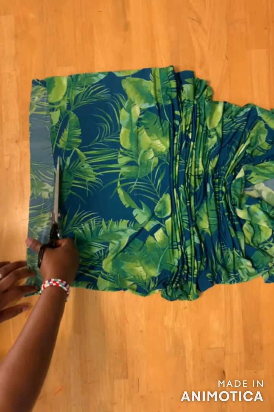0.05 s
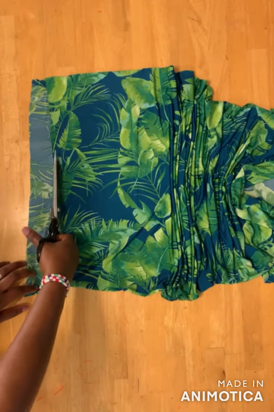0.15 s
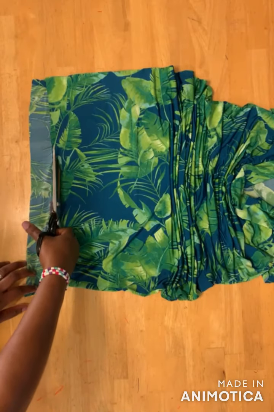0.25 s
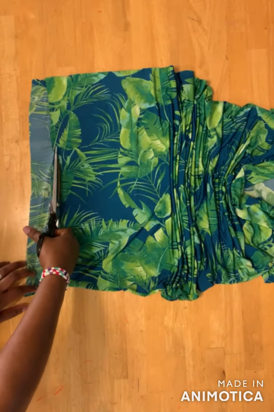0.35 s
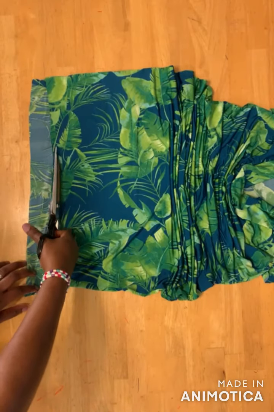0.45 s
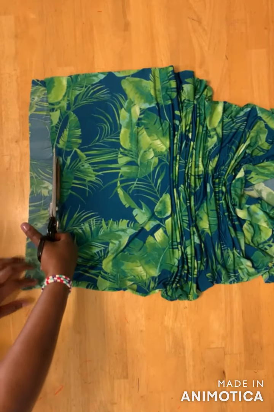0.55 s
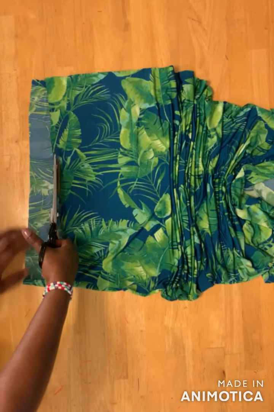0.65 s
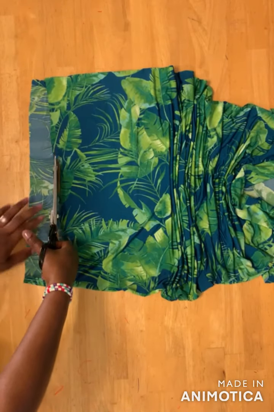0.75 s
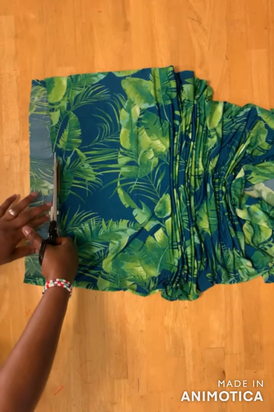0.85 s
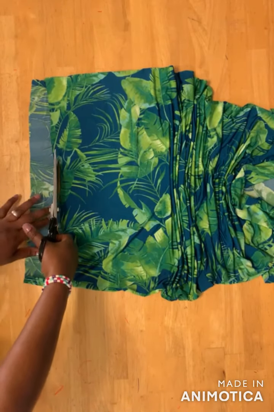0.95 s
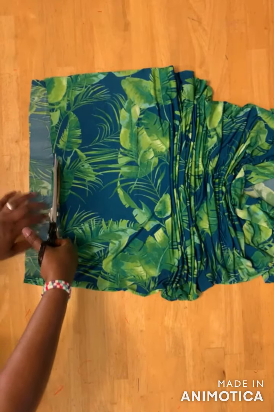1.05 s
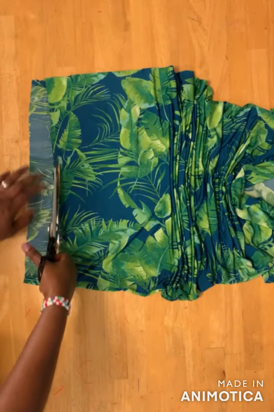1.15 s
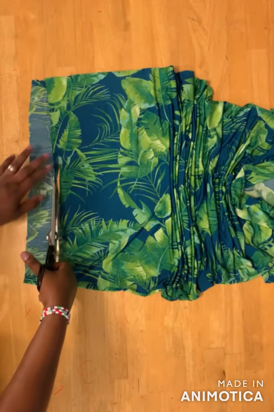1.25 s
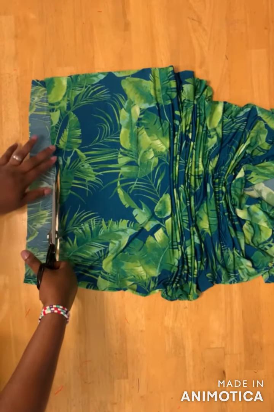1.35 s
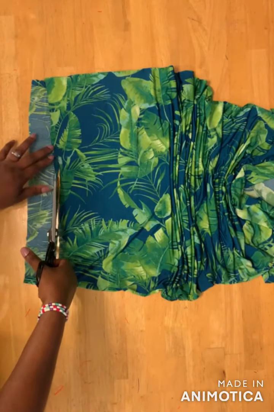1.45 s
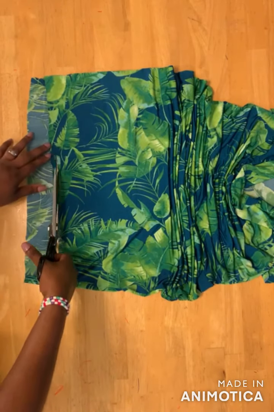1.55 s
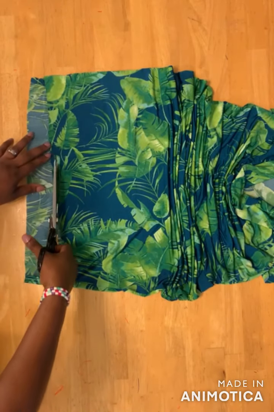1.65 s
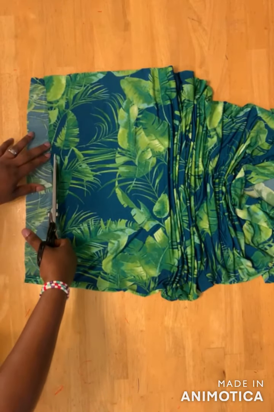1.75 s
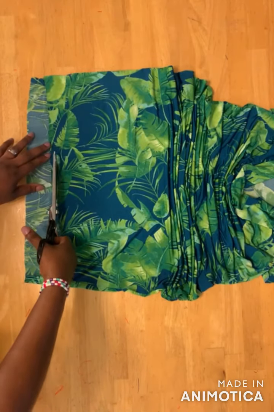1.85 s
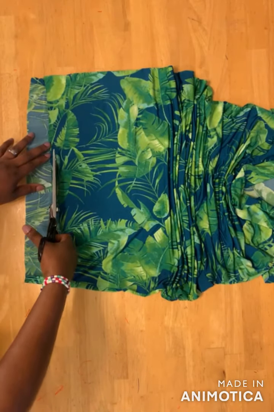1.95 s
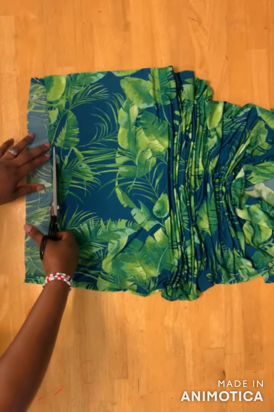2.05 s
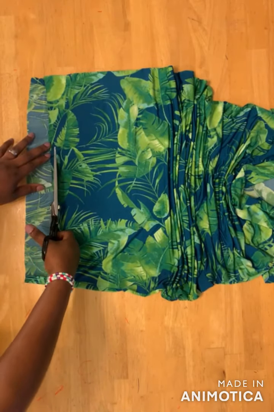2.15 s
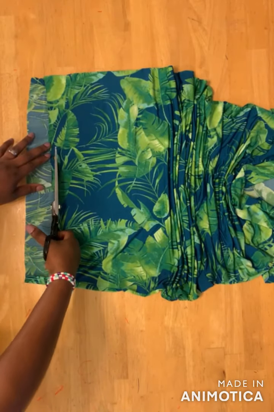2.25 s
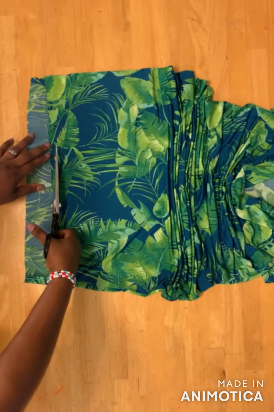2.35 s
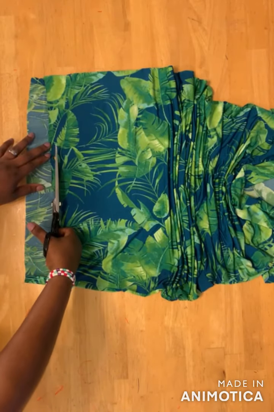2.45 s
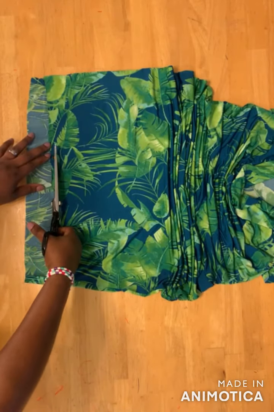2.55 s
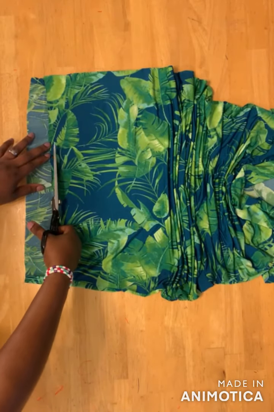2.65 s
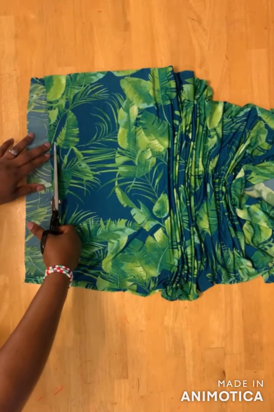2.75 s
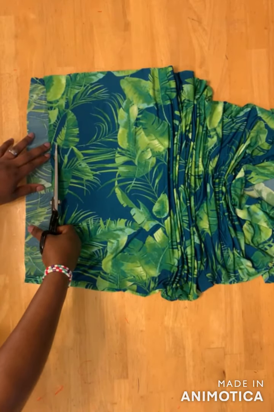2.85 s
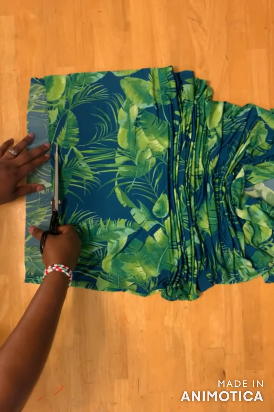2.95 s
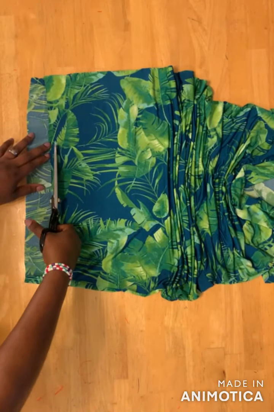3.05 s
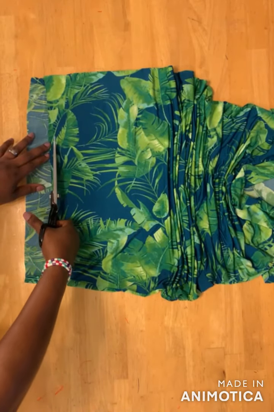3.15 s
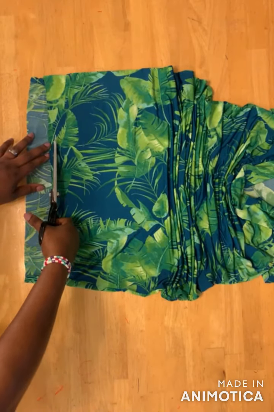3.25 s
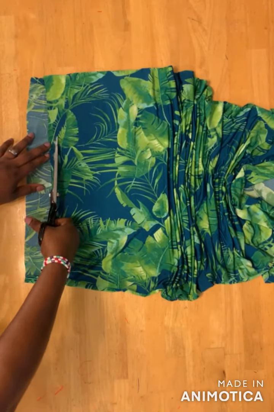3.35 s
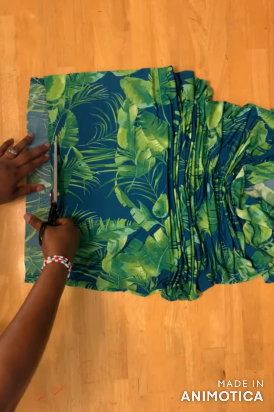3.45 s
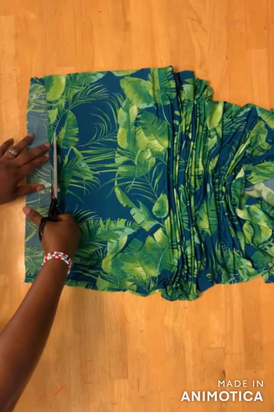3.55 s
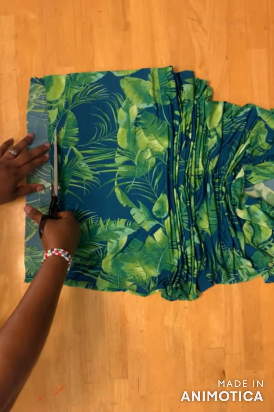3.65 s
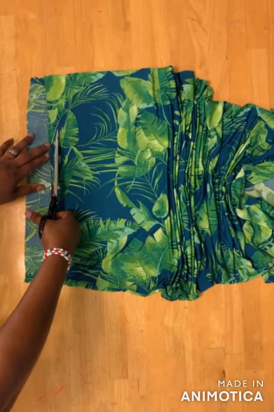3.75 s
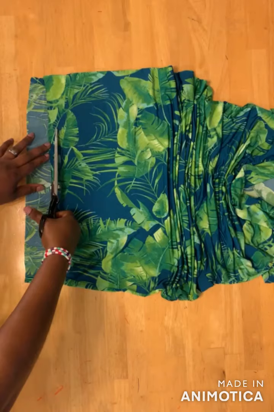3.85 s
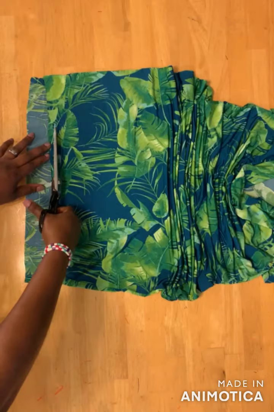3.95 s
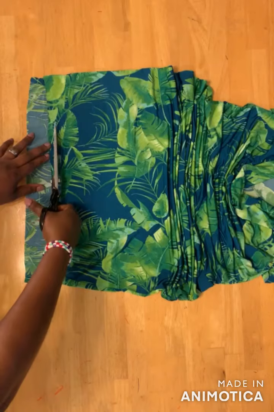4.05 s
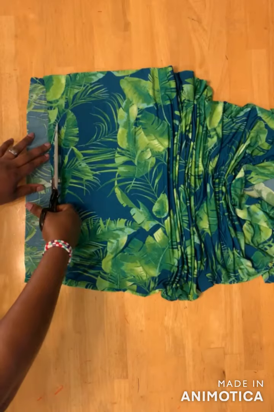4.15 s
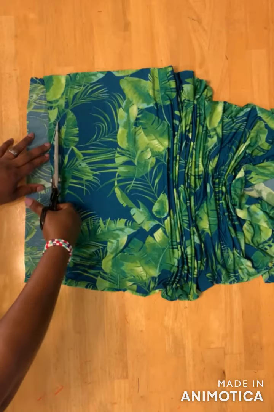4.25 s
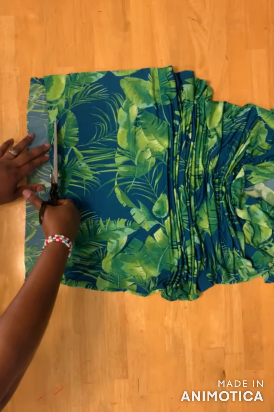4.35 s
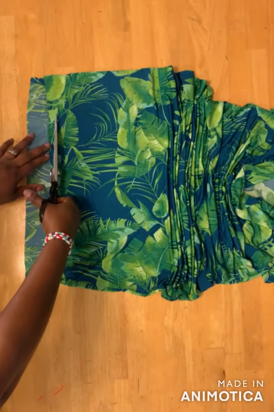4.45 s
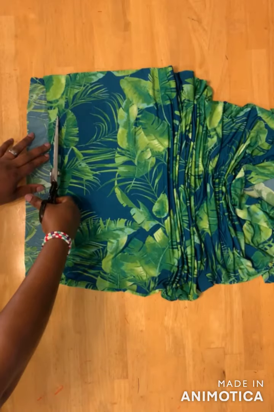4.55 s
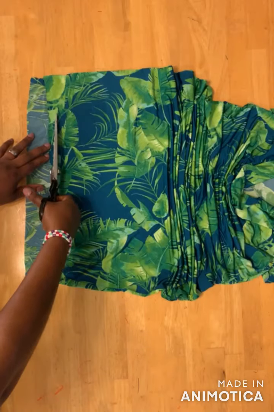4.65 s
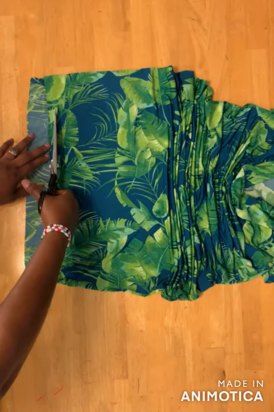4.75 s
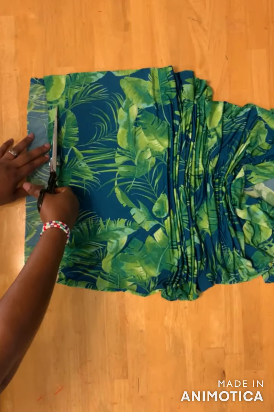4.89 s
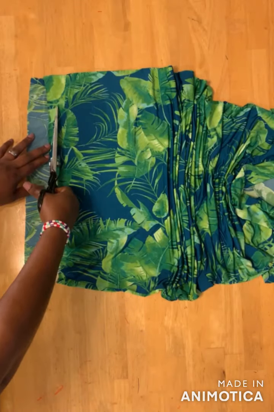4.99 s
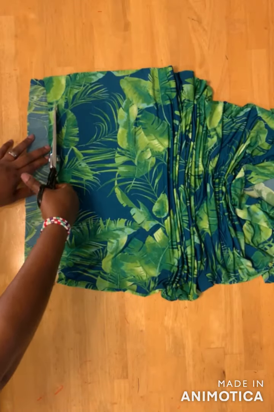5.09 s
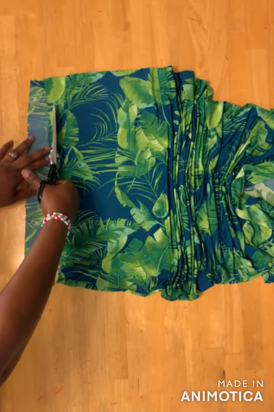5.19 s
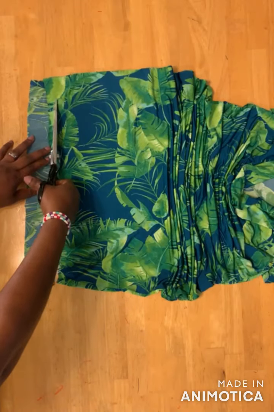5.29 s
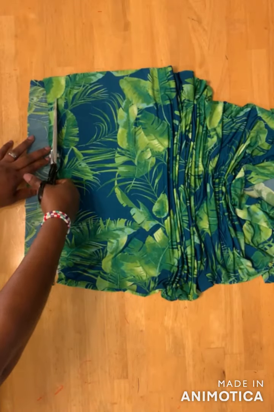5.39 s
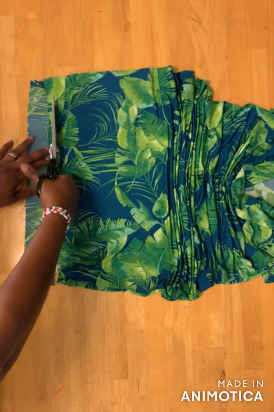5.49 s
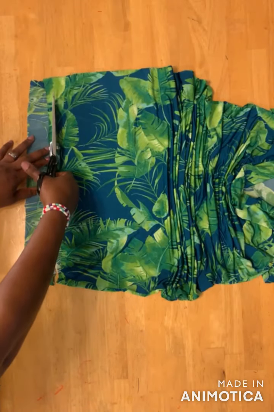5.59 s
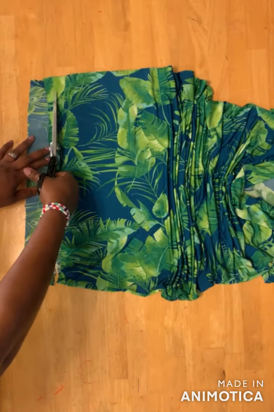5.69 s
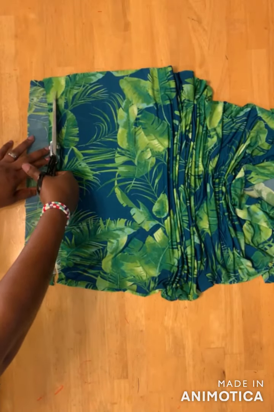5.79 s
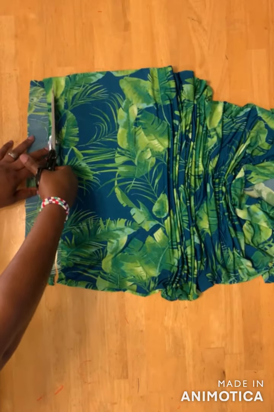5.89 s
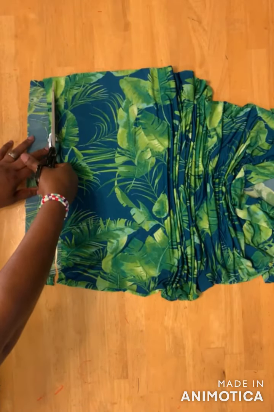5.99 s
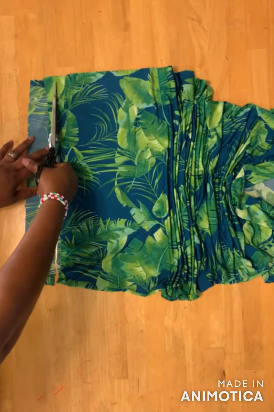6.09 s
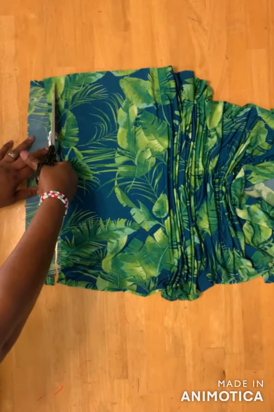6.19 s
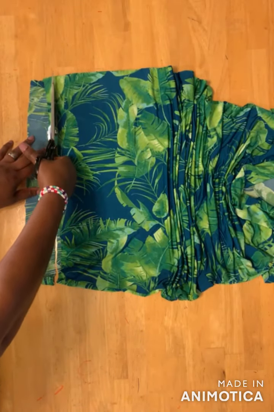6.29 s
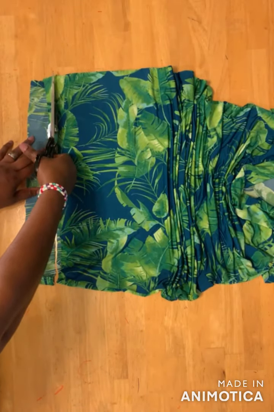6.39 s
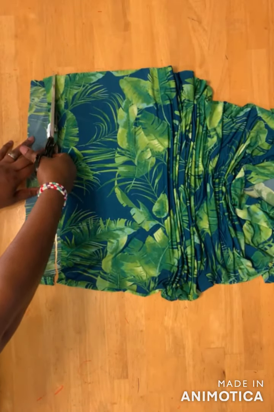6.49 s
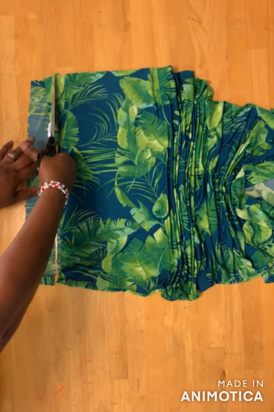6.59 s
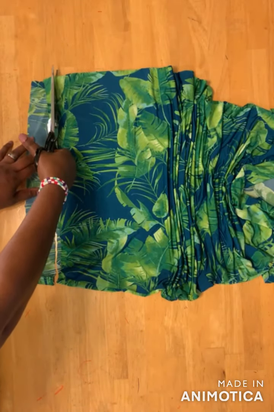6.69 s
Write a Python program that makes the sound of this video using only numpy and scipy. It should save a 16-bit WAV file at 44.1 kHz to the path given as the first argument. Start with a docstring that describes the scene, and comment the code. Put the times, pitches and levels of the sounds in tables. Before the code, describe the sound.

Soft fingertip pats on cloth, then eleven even, crunchy scissor cuts with scraping, clicking reopenings, and a loud final clack over faint room hum.

```python
"""Long steel scissors cut stretchy cloth spread on a wooden floor, below a phone with two microphone ports.
Each closing stroke crunches: uneven thread snaps and noise ring the boards, handles and blades.
Each opening stroke clicks and scrapes, and the last closing stroke snaps shut with a burst of hard blows.
A hand pats the cloth (short fading low tones) and strokes it (grainy noise); the pivot squeaks (rough tones).
Behind them lie patchy room noise, a fuzzy appliance hum and a mains tone; the cutting also echoes in the room."""
import sys
import numpy as np
from scipy import signal
from scipy.fft import rfft, irfft, next_fast_len
from scipy.io import wavfile
from scipy.ndimage import uniform_filter1d, map_coordinates

SR = 44100
rng = np.random.default_rng(int(sys.argv[2]) if len(sys.argv) > 2 else 0)


def wav_out(sig):
    """Save sig, one row per channel (or a flat mono array), as 16-bit PCM at SR to the path in sys.argv[1]."""
    wavfile.write(sys.argv[1], SR, np.round(np.clip(np.atleast_2d(sig).T, -1, 1) * 32767).astype(np.int16))


N = 296793  # length in samples

# All levels are relative: later gains still shift them.

# --- closing and opening strokes
# Closing strokes: start_s, time_to_full_bite_s, length_s, start_firmness_db, boards_db, crunch_db,
# scrape_db, hiss_db, and for the first contact: steel_db, knock_db
CUTS = [(2.301, 0.067, 0.15, 4.5, -45, -34, -48, -52, -46, -36),
        (2.775, 0.056, 0.1, -6, -43.5, -28, -45, -47.5, -81, -35),
        (3.198, 0.028, 0.091, 4, -45, -39.5, -52, -51, -72, -33),
        (3.604, 0.042, 0.087, -3.5, -38.5, -31, -42, -51.5, -72, -38),
        (3.979, 0.036, 0.1, -10, -44, -28.5, -40.5, -48.5, -62, -25),
        (4.36, 0.044, 0.12, -4.5, -36, -36, -47, -49, -47.5, -31),
        (4.75, 0.037, 0.083, -17.5, -41.5, -30.5, -43, -53, -56.5, -38.5),
        (5.125, 0.024, 0.124, -12.5, -38, -32.5, -42.5, -54, -61, -34),
        (5.509, 0.026, 0.099, -4, -40.5, -26, -41.5, -48, -68, -34),
        (5.902, 0.061, 0.065, -11, -41.5, -21, -45, -80, -65, -32),
        (6.301, 0.124, 0.17, -18, -31, -24, -57, -56, -59, -32)]
# First contact against full bite, for boards, crunch, scrape, hiss: level_db
BITE_DB = [7.5, -7, -9.5, -22]
# How fast boards, crunch, scrape, hiss weaken after full bite: loss_db_per_s
SAG_DB_PER_S = [114, 178, 151, 60.3]
CUT_ATTACK_S, CUT_RELEASE_S = 0.0033, 0.0072
LEAD_S, LEAD_DB = 0.022, -12  # the blade presses into the cloth before it bites
# Blades catching on a tougher bunch of threads: start_s, steel_db, knock_db, edge_db, twang_pitch_hz
CATCHES = [(0.04, -40.5, -45, -37.5, 1200), (2.31, -44.5, -29, -59, 555), (2.333, -34, -28, -46.5, 760),
           (2.362, -39, -49, -45, 650), (2.4045, -39, -24, -45.5, 787), (2.8037, -43, -40.5, -53, 503),
           (2.832, -45, -36, -44, 780), (2.8848, -47, -46, -55, 1380), (3.2199, -43, -31.5, -53, 507),
           (3.245, -34, -25, -43, 762), (3.606, -61, -30, -67, 890), (3.6303, -45.5, -52, -65, 660),
           (3.6679, -58, -29, -65, 795), (3.7262, -55, -48, -56, 970), (3.983, -45, -39, -61, 1640),
           (4.013, -35, -26.5, -66, 1040), (4.3876, -31.5, -29, -60, 1443), (4.398, -54, -24, -68, 1376),
           (4.4219, -36.5, -31.5, -56, 1385), (4.7945, -36, -25, -50.5, 1446), (5.1574, -60, -27, -70, 490),
           (5.169, -53, -54, -72, 1470), (5.179, -41, -36.5, -55, 1270), (5.198, -47, -32, -56, 1080),
           (5.2372, -66, -64, -62, 1120), (5.512, -64, -35, -63, 1115), (5.5346, -54, -25.5, -55, 486),
           (5.5658, -31.5, -36, -56, 1090), (5.907, -47, -47.5, -68, 580), (5.9307, -37, -25.5, -71, 1186),
           (5.9631, -33, -30, -77, 746), (5.975, -62, -28.5, -77, 1487), (6.167, -40, -49.5, -42.5, 1300),
           (6.3284, -45, -36, -53, 720), (6.344, -35, -34, -41, 520), (6.36, -32, -36, -33.5, 525),
           (6.383, -33.5, -22, -45, 548), (6.396, -34, -30, -43, 1290), (6.4193, -24.5, -17.5, -42, 620),
           (6.4751, -45, -52, -33.5, 1400)]
# Opening strokes: start_s, steel_click_db, knock_db, cloth_rub_db, twang_pitch_hz
OPENS = [(.004, -40.5, -44, -68, 1120), (2.552, -40.5, -38, -34.5, 1060), (2.978, -39.5, -32.5, -42.5, 823),
         (3.381, -43, -43, -36, 494), (3.793, -43, -35.5, -47.5, 427), (4.168, -40, -39.5, -38, 1020),
         (4.548, -42.5, -38, -37, 730), (4.94, -42, -48, -42, 1390), (5.313, -46, -36, -35.5, 424),
         (5.707, -42, -45, -42, 1160), (6.119, -40, -66, -37.5, 1222)]
# Share of the opening rub in boards, crunch, scrape, hiss: level_db
RUB_MIX_DB = [-27, 2.5, -11, -21]
RUB_ATTACK_S, RUB_T60_S = 0.004, 0.17  # T60: time to fall by 60 dB
# Blades sliding along each other near the ends of their travel: middle_s, length_s, scrape_db, hiss_db
SLIDES = [(-0.001, 0.14, -45, -45), (0.048, .026, -64, -45), (3.834, 0.034, -67, -64),
          (5.002, 0.067, -46.5, -51.5), (5.401, 0.075, -47.5, -53.5), (5.788, 0.12, -52, -61),
          (6.169, 0.074, -47.5, -41.5), (6.481, 0.043, -22, -45)]
SLIDE_CRUNCH_DB = 1  # the handles rumble along, against the scrape
EDGE_CLICK_DB = -5.5  # edge against steel at first contacts and opening clicks

# --- what rings
# Floor boards: pitch_hz, width_hz, level_db
BOARD_MODES = [(58.4, 16.3, -2), (115.7, 56.5, 0.5), (164, 61, 2), (249.5, 20, 3.5), (313, 53, -1),
               (365.6, 143, -4.5)]
# Handle and cloth on wood: pitch_hz, width_hz, first_cut_level_db, last_cut_level_db
BODY_MODES = [(525, 165.5, 8, 17.5), (673, 172, 10, 16.5), (769, 83.6, 12.5, 15), (1104, 47, 11, 16),
              (1254, 24.4, 10, 18.5), (1376, 37.5, 8, 17), (1508, 71, 1, 15.5), (1681, 53, -1, 6),
              (1746, 36, -7.5, 9.5), (1873, 135, -19.5, -1)]
# Steel blades, body and thin edge: pitch_hz, width_hz, level_db
STEEL_MODES = [(2376, 180, 3.5), (3030, 83, 8), (3274, 51, 9.5), (3800, 600, 1), (3875, 63, 1.5),
               (4160, 270, -22.5), (5450, 350, 7.5), (5675, 98, 14), (5807, 360, 6.5), (6340, 24.3, 5.5),
               (6460, 230, 0), (7394, 87, 1)]
# Highest ringing, for the edge hiss: pitch_hz, width_hz, level_db
EDGE_MODES = [(7900, 74, -8.5), (8650, 670, 1.5), (9470, 410, -17.5), (10600, 82, -18.5), (9880, 270, 2.5),
              (10230, 74, 5), (10640, 275, 1), (11680, 220, -3.5)]
# Long blade's bending tone while it hangs free of the cloth: time_s, level_against_crunch_db
SINGING = [(0, -16), (2.35, -16), (2.85, -29), (3.25, -11.5), (3.66, -14.5), (4.05, -11), (4.4, -10),
           (4.6, -11), (4.82, -20), (5.0, -13.5), (5.2, -6), (5.38, -19), (5.58, -9.5), (5.78, -10.5),
           (5.9, -37), (6.2, -22), (6.3, -39)]
BEND_HZ, BEND_T60_S = 943, 0.21
TWANG_T60_S, TWANG_ATTACK_S = 0.033, 0.002

# --- final snap and pivot
# Handle stops graze, meet, then rebound more softly: start_s, level_db, treble_db
SHUT = [(6.466, -23, -10), (6.4806, -11, -4), (6.4818, 1, 1), (6.4843, -7, -3), (6.4885, -5, -6),
        (6.493, -6, -6), (6.498, -11, -5)]
# Handle stops ringing on the boards: pitch_hz, width_hz, level_db
STOP_MODES = [(53.3, 4.6, -2.5), (73.7, 8, -17), (140, 24, -2), (186.7, 21, 0.5), (247, 98, 1.5),
              (390, 80, 4), (680, 28, 0), (1075, 25, 8), (1370, 165, 4.5), (1480, 142, 1.5),
              (1700, 130, 7.5), (1910, 324, 0.5), (2270, 69, -21.5), (2460, 69, -11.5), (2860, 31, -12.5),
              (3290, 410, -7.5), (3690, 430, -8), (5260, 940, -17.5), (6250, 175, -16.5),
              (6930, 740, -23.5), (9640, 330, -17.5)]
SOFT_HZ = 2510  # the treble level acts above here
SNAP_WET_DB = -5  # the snap gets less room echo than the strokes
# Pivot squeaking under load: start_s, length_s, pitch_hz, level_db
SQUEAKS = [(.015, .03, 2380, -64), (4.385, .06, 2480, -60), (4.985, .045, 2420, -63),
           (5.38, .06, 2470, -57), (5.555, .06, 2490, -58), (5.765, .065, 2480, -65),
           (5.925, .08, 3400, -60), (6.405, .04, 3320, -46)]

# --- hand on the cloth
# Pats and fingertip taps: start_s, level_db, pitch_hz
PATS = [(0.671, -37.5, 163), (0.68, -51, 1090), (0.721, -33.5, 302), (0.749, -48, 320), (0.9, -30, 215),
        (0.931, -30.5, 240), (1.151, -39, 264), (1.517, -45.5, 1093), (1.67, -47, 262), (1.701, -37, 288),
        (1.737, -37, 114), (1.753, -53, 220)]
# Fingers or open blades sliding on the cloth: start_s, length_s, level_db
RUSTLES = [(0.573, 0.068, -65.5), (0.633, 0.099, -64.5), (1.318, 0.023, -71.5), (1.507, 0.039, -66),
           (1.57, 0.053, -62.5), (2.207, 0.096, -60), (3.168, 0.061, -63), (3.569, 0.051, -56)]
# Tone colour of the rustle: pitch_hz, level_db
CLOTH_COLOUR = [(300, 6), (1100, 9.5), (2200, -3.5), (3500, -16), (5000, -10), (11000, -19.5)]

# --- room and microphone ports (likeness: 0 is unrelated, 1 is alike, left against right)
# Time for the room echo to fall by 60 dB: pitch_hz, fall_time_s
ROOM_T60 = [(100, 0.65), (500, 0.25), (1500, 0.37), (4000, 0.28), (11000, 0.2)]
# Room echo against direct sound: pitch_hz, level_db
ROOM_COLOUR = [(100, -10), (500, -1.5), (1500, -4), (4000, -8), (11000, -12.5)]
# Likeness of the room echo: pitch_hz, likeness_0_to_1
ROOM_ALIKE = [(100, 1), (400, 1), (900, 0), (3200, 0.38), (6000, 1), (11000, 0.78)]
# Likeness of the direct sound, loosened by scatter off hand and cloth: pitch_hz, likeness_0_to_1
NEAR_ALIKE = [(300, 1), (1000, 0.8), (2500, 0.5), (4500, 0.84), (8500, 0.98), (12000, 0.82)]
SCATTER_T60_S = 0.005
# How far the left port's wave is ahead: pitch_hz, phase_radians
PORT_PHASE = [(60, 0), (500, -.3), (1100, -.4), (1600, .4), (2200, .7), (3500, 1.9), (4300, 2.9),
              (5200, 3.4), (6300, 6.1), (7400, 6.6), (8400, 9.1), (9400, 9.7), (10500, 12.1), (11400, 12.8),
              (12200, 14)]
# How much louder the left port is: pitch_hz, left_minus_right_db
PORT_LEVEL = [(200, 0), (700, -0.5), (1400, -0.5), (3000, -0.5), (8000, 0.5), (12000, 0)]
TOP_HZ = 12500  # the phone's upper band limit

# --- background
# Tone colour of the room noise: pitch_hz, level_db
AIR_COLOUR = [(20, -12.5), (40, -5.5), (60, 6.5), (90, -19), (125, -2), (190, -4.5), (250, -16.5),
              (400, -3.5), (800, -15), (1150, -18), (1500, -19), (2400, -35.5), (5000, -39.5),
              (11500, -43.5)]
# Appliance hum: pitch_hz, width_hz, level_db
HUM_MODES = [(59.1, 7.4, -3.5), (121.6, 9.5, -1.5), (242.6, 11.2, 2), (309.3, 31.6, -4), (1077, 13, -11.5),
             (1210, 33, -16)]
# Likeness of the background: pitch_hz, likeness_0_to_1
AIR_ALIKE = [(25, 0.7), (60, 1), (150, 1), (400, 0.94), (900, 0), (3200, 0), (4400, 1), (11000, 1),
             (12000, 0.1)]
MAINS_HZ = 58.4


def cutting():
    """Thread snaps and jolts shake boards, handle and steel; the handle's ring changes from first cut to last."""
    boards, crunch, scrape, hiss = stroke_gains()
    steel, knock, edge = jolts()
    board_grain = threads(rate=500, spread_db=-1.5, clump_db=2.0, smooth=0.25)
    crunch_grain = threads(rate=350, spread_db=2, clump_db=3.5, smooth=0.2)
    fine_grain = threads(rate=800, spread_db=2.5, clump_db=4, smooth=0.5)

    # the forces that set each part ringing
    board_force = boards * board_grain + amp(2) * knock
    body_force = patchy(crunch * crunch_grain + amp(10) * knock, depth_db=3, bins=2, frames=12)
    steel_force = patchy(scrape * fine_grain + amp(7) * steel, depth_db=5.5, bins=2, frames=16)
    edge_force = patchy(hiss * fine_grain + amp(14) * edge, depth_db=5.5, bins=2, frames=16)

    # crossfade the handle's ring from the first cut to the last
    travel = np.interp(seconds(), [CUTS[0][0], CUTS[-1][0]], [0, np.pi / 2])
    first_ring = ringing(body_force, [(hz, width, first) for hz, width, first, _ in BODY_MODES])
    last_ring = ringing(body_force, [(hz, width, last) for hz, width, _, last in BODY_MODES])
    body = np.cos(travel) * first_ring + np.sin(travel) * last_ring

    wood = amp(-2.5) * ringing(board_force, BOARD_MODES) + amp(-9.5) * body
    blades = amp(-7) * ringing(steel_force, STEEL_MODES) + amp(-3) * ringing(edge_force, EDGE_MODES)
    return wood + blades + singing(crunch) + twangs()


def stroke_gains():
    """Loudness of boards, crunch, scrape and hiss: cuts bite and sag, rubs die away, slides swell and fade."""
    gains, t = np.zeros((4, N)), seconds()
    bite, sag, rub_mix = (np.array(v)[:, None] for v in (BITE_DB, SAG_DB_PER_S, RUB_MIX_DB))
    for start, rise, span, firmness_db, *levels_db, _, _ in CUTS:
        level = np.array(levels_db)[:, None]
        here = slice(round(start * SR), round(start * SR) + SR // 3)
        u = t[here] - start
        shape_db = (bite + firmness_db) * np.clip(1 - u / rise, 0, 1) - sag * np.clip(u - rise, 0, 1)
        fade_in = np.clip(u / CUT_ATTACK_S, 0, 1)
        fade_out = np.clip(1 - (u - span) / CUT_RELEASE_S, 0, 1)
        gains[:, here] += fade_in * fade_out * amp(level + shape_db)
        # the soft press just before the bite
        press = np.clip(1 + (t - start) / LEAD_S, 0, 1) * np.clip(1 - (t - start) / CUT_ATTACK_S, 0, 1)
        gains += press * amp(level + bite + firmness_db + LEAD_DB)
    for start, _, _, rub_db, _ in OPENS:
        here = slice(round(start * SR), round(start * SR) + SR // 3)
        u = t[here] - start
        onset = 1 - np.exp(-abs(u) / RUB_ATTACK_S)
        gains[:, here] += amp(rub_db + rub_mix - 60 * u / RUB_T60_S) * onset
    for middle, span, scrape_db, hiss_db in SLIDES:
        swell = np.cos(np.pi * np.clip((t - middle) / span, -.5, .5)) ** 2
        gains[1:] += swell * amp([[scrape_db + SLIDE_CRUNCH_DB], [scrape_db], [hiss_db]])
    return gains


def threads(rate, spread_db, clump_db, smooth):
    """Parting threads: clumps of uneven clicks (rate a second) mixed with a share of smooth friction noise."""
    when, size = rng.random((2, N))
    sizes = amp(-spread_db * np.log(size + 1e-3))
    snaps = (when < rate / SR) * sizes * rng.choice([-1, 1], N)
    mix = np.sqrt(1 - smooth) * unit(snaps) + np.sqrt(smooth) * rng.standard_normal(N)
    return evened(mix * amp(clump_db * wobble(70)), span=.035)


def jolts():
    """First contacts, catches and opening clicks: short noise bursts of force on steel, handle and edge."""
    out, t = np.zeros((3, N + SR)), np.arange(SR // 20) / SR
    clicks = [(cut[0], *cut[-2:]) for cut in CUTS] + [opening[:3] for opening in OPENS]
    hits = [(*click, click[1] + EDGE_CLICK_DB) for click in clicks] + [c[:4] for c in CATCHES]
    fall_s = np.array([[0.04], [0.04], [0.035]])  # time to fall by 60 dB: steel, knock, edge
    shape = amp(-60 * t / fall_s) * (1 - np.exp(-t / 0.003))
    for start, *levels_db in hits:
        burst = shape * rng.standard_normal((3, len(t)))
        out[:, round(start * SR):][:, :len(t)] += amp(levels_db)[:, None] * burst
    return out[:, :N]


def singing(crunch):
    """The bending tone builds up under the crunch and dies slowly, wavering in loudness and pitch."""
    t, keep = seconds(), amp(-60 / (BEND_T60_S * SR))
    push = crunch * amp(np.interp(t, *np.transpose(SINGING)))
    swell = signal.lfilter([1 - keep], [1, -keep], push)
    waver = amp(4 + 3 * wobble(20) + 3 * wobble(70))
    return waver * swell * np.sin(2 * np.pi * (BEND_HZ * t + .14 * wobble(40)))


def twangs():
    """Catches and opening clicks pluck the handle mode under the contact point: a short fading tone."""
    out, t = np.zeros(N + SR), np.arange(SR // 8) / SR
    shape = amp(-60 * t / TWANG_T60_S) * (1 - np.exp(-t / TWANG_ATTACK_S))
    for start, _, knock_db, _, hz in CATCHES + OPENS:
        out[round(start * SR):][:len(t)] += amp(knock_db) * shape * np.sin(2 * np.pi * hz * t)
    return out[:N]


def snap():
    """Hard blows into the handle stops: each is a sharp contact, then a few milliseconds of chatter."""
    force, t = np.zeros(N), np.arange(SR // 50) / SR
    bursts = 5 * (t == 0) + .22 * rng.standard_normal((len(SHUT), len(t)))
    dull = signal.lfilter(*signal.butter(2, SOFT_HZ, fs=SR), bursts)
    for (start, db, treble_db), full, low in zip(SHUT, bursts, dull):
        blow = low + amp(treble_db) * (full - low)
        force[round(start * SR):][:len(t)] += amp(db - 60 * t / 0.016) * blow
    return ringing(force, STOP_MODES)


def squeaks():
    """The pivot sticks and slips: a short tone, rough in pitch and loudness."""
    t = seconds()
    waver = 18 * np.cumsum(wobble(150)) / SR  # in turns of the wave: the pitch wanders by some 18 Hz
    flutter = amp(5 * wobble(250) - 2)
    tones = sum(amp(db) * arch(start, span) * np.sin(2 * np.pi * (hz * t + waver))
                for start, span, hz, db in SQUEAKS)
    return flutter * tones


def pats():
    """Soft finger contacts: each a quickly fading tone, mostly a low thump."""
    out, t = np.zeros(N + SR), np.arange(SR // 4) / SR
    for start, db, hz in PATS:
        shape = amp(db - 60 * t / 0.055) * (1 - np.exp(-t / 0.0015))
        out[round(start * SR):][:len(t)] += shape * np.sin(2 * np.pi * hz * t)
    return out[:N]


def rustles():
    """Faint grainy friction on the cloth: dense thread clicks and noise, tinted by the cloth."""
    gain = sum(amp(db) * arch(start, span) for start, span, db in RUSTLES)
    grain = threads(rate=1200, spread_db=1.5, clump_db=3, smooth=0.55)
    return gain * unit(filtered(grain, lambda hz: amp(along(CLOTH_COLOUR, hz))))


def scatter(x):
    """A few milliseconds of scatter off the nearby hand and cloth, drawn anew every tenth of a second."""
    out, hop, t = np.zeros(N + SR), SR // 10, np.arange(SR // 50) / SR
    for start in range(0, N, hop):
        echo = amp(-60 * t / SCATTER_T60_S) * rng.standard_normal(len(t))
        piece = signal.fftconvolve(x[start:start + hop], echo / np.linalg.norm(echo))
        out[start:start + len(piece)] += piece
    return out[:N]


def room(x):
    """Two noise-like echo tails, drawn anew every third of a second; each pitch dies at its own speed."""
    out, hop, delay = np.zeros((2, N + 2 * SR)), SR // 3, 300  # delay in samples
    for start in range(0, N, hop):
        hz, t, z = signal.stft(rng.standard_normal((2, SR // 2)), SR, nperseg=256)
        fading = z * amp(-60 * t / along(ROOM_T60, hz)[:, None])
        tail = signal.istft(fading, SR, nperseg=256)[1]
        wet = signal.fftconvolve(x[None, start:start + hop], tail / np.linalg.norm(tail[0]), axes=1)
        begin = start + delay
        out[:, begin:begin + wet.shape[1]] += wet
    return out[:, :N]


def ports(pair, alike):
    """Blend two unrelated sounds to the given left-right likeness, then step phase and level between ports."""
    half = np.array([[.5], [-.5]])

    def blend(hz):
        turn = np.arccos(np.clip(along(alike, hz), 0, 1)) / 2
        return np.array([np.cos(turn), np.sin(turn)])

    def step(hz):
        return amp(half * along(PORT_LEVEL, hz)) * np.exp(1j * half * along(PORT_PHASE, hz))

    mid, side = filtered(pair, blend)
    return filtered(np.array([mid + side, mid - side]), step)


def air():
    """Room noise in slow patches, a fuzzy hum of noise through narrow resonances, and a wavering mains tone."""
    pair = patchy(rng.standard_normal((2, N)), depth_db=3.5, bins=3, frames=20)
    noise = unit(filtered(pair, lambda hz: amp(along(AIR_COLOUR, hz))))
    hum = unit(ringing(rng.standard_normal((2, N)), HUM_MODES)) * amp(1.5 * wobble(9))
    hum = filtered(hum, lambda hz: 1 / (1 + (hz / 1600) ** 4))
    mains_turns = MAINS_HZ * seconds() + 0.038 * wobble(3.1)
    mains = amp(-57.5 + 1.4 * wobble(12)) * np.sin(2 * np.pi * mains_turns)
    return amp(-60.5) * noise + amp(-53.5) * hum + mains * [[1], [0]]  # mains goes into the shared part only


def amp(db):
    """Turn a level in dB into a plain multiplier."""
    return 10 ** (np.asarray(db) / 20)


def seconds():
    """The time of every sample, in seconds."""
    return np.arange(N) / SR


def arch(start, span):
    """A smooth half-sine rise and fall, from start over span seconds."""
    return np.sin(np.pi * np.clip((seconds() - start) / span, 0, 1))


def unit(x):
    """x scaled to an average strength (rms) of 1."""
    return x / np.sqrt(np.mean(x ** 2) + 1e-20)


def evened(x, span):
    """x with its running strength (rms) over span seconds held at about 1."""
    return x / np.sqrt(abs(uniform_filter1d(x ** 2, size=int(span * SR))) + 1e-9)


def along(points, hz):
    """Read a curve of (pitch_hz, value) points, joined by straight lines on a log pitch axis."""
    f, v = np.transpose(points)
    return np.interp(np.log(hz + 1), np.log(f + 1), v)


def wobble(rate):
    """A smooth random curve with rate new random points a second."""
    return map_coordinates(rng.standard_normal(int(N * rate / SR) + 4), [np.arange(N) * rate / SR])


def filtered(x, response):
    """x with each frequency multiplied by response(hz), which may also turn its phase."""
    m = next_fast_len(N + SR // 2)
    return irfft(rfft(x, m) * response(np.fft.rfftfreq(m, 1 / SR)), m)[..., :N]


def ringing(x, modes):
    """x through a set of resonances with alternating signs, scaled together to unit energy."""
    def response(f):
        total = 0
        for k, (hz, width, db) in enumerate(modes):
            total = total + (-1) ** k * amp(db) * 1j * f * width / (hz * hz - f * f + 1j * f * width)
        return total / np.sqrt(np.mean(abs(total) ** 2))
    return filtered(x, response)


def patchy(x, depth_db, bins, frames):
    """x recoloured in random patches of pitch and time; the gains at each moment average to unit power."""
    z = signal.stft(x, nperseg=256)[2]
    field = uniform_filter1d(rng.standard_normal(z.shape[-2:]), size=bins, axis=0)
    field = uniform_filter1d(field, size=frames, axis=1)
    gain = amp(depth_db * unit(field))
    gain = gain / np.sqrt(np.mean(gain ** 2, axis=0))
    return signal.istft(z * gain, nperseg=256)[1][..., :N]


def scene():
    """Scissors and hand reach the ports directly and through the room (no room for squeaks), over background."""
    near, shut = cutting() + pats() + rustles(), snap()
    direct = amp(-1.0) * (near + shut + squeaks())
    echo = room(near + amp(SNAP_WET_DB) * shut)
    echo = filtered(echo, lambda hz: amp(along(ROOM_COLOUR, hz)))
    close_sound = ports(np.array([direct, scatter(direct)]), NEAR_ALIKE)
    return close_sound + ports(echo, ROOM_ALIKE) + ports(air(), AIR_ALIKE)


def record(dry):
    """The phone rolls off its top treble and keeps nothing above its band limit."""
    return filtered(dry, lambda hz: (hz < TOP_HZ) / (1 + (hz / 11900) ** 40))


dry = scene()
out = record(dry)
wav_out(out)
```